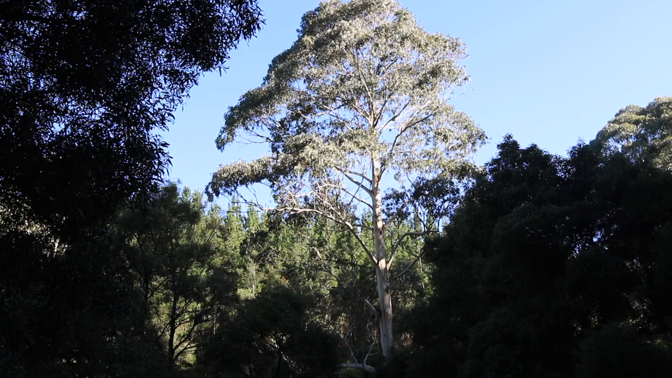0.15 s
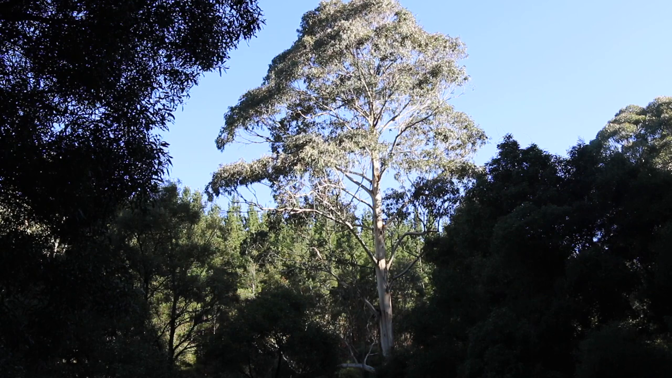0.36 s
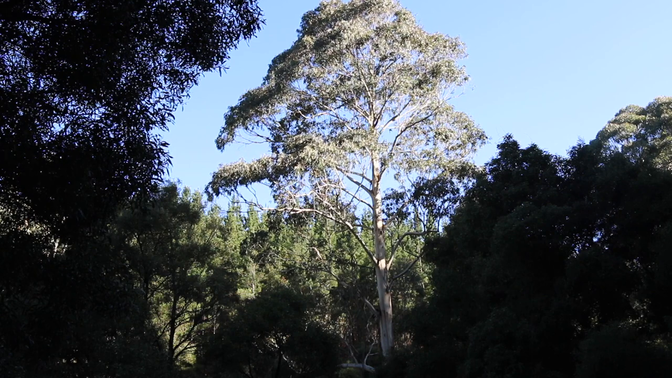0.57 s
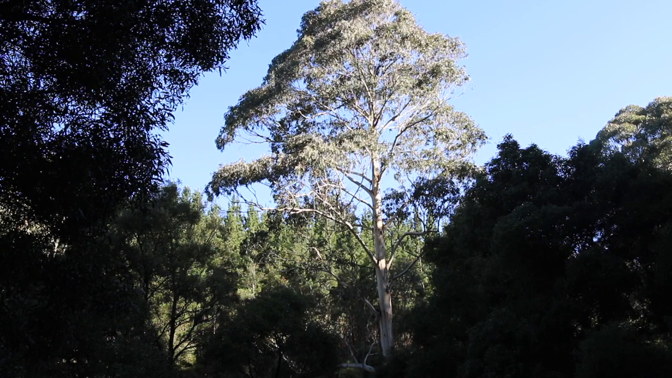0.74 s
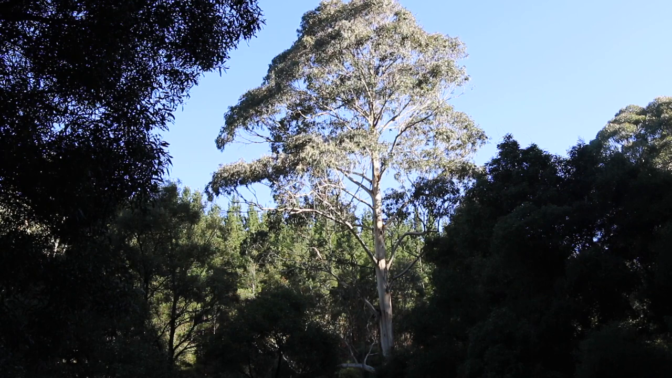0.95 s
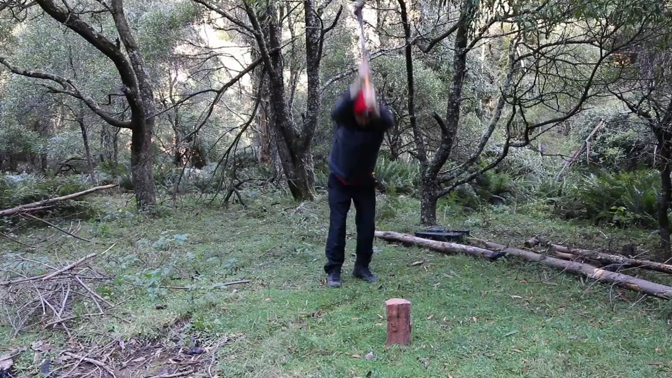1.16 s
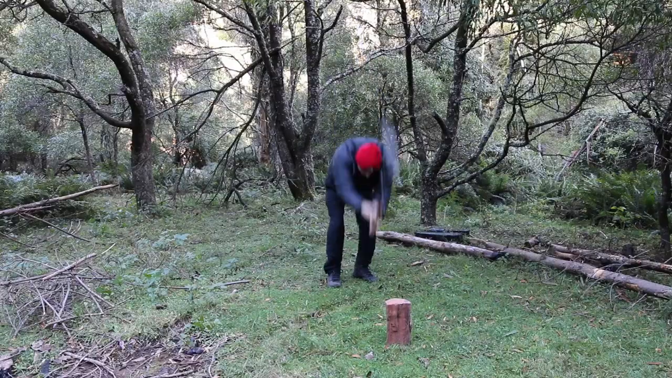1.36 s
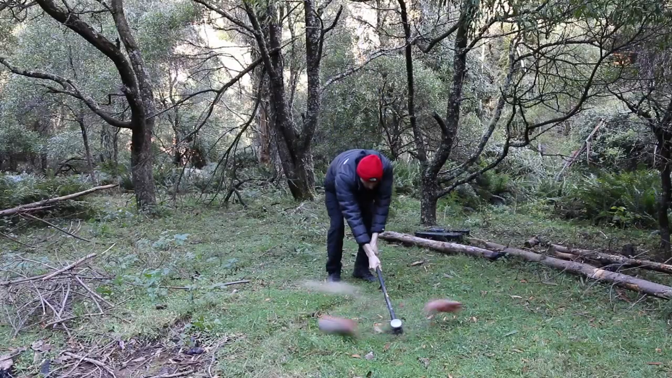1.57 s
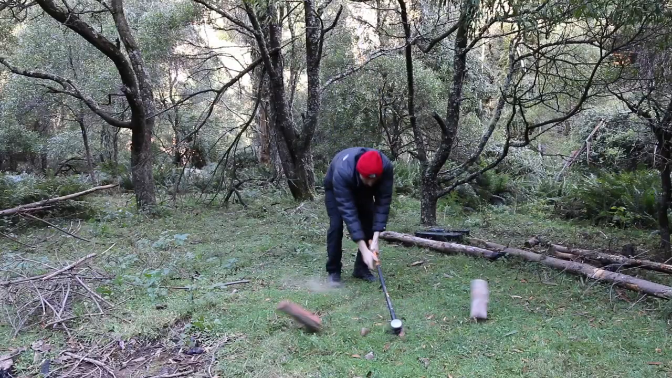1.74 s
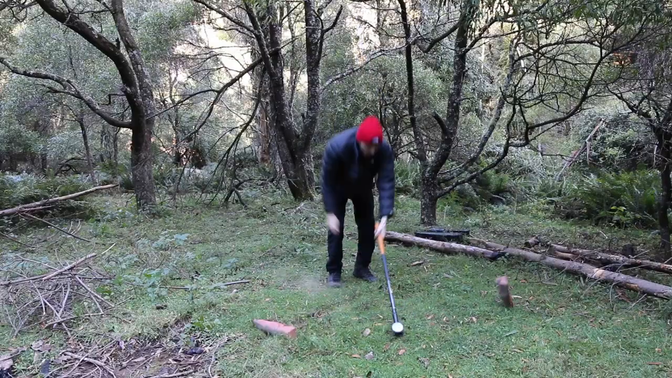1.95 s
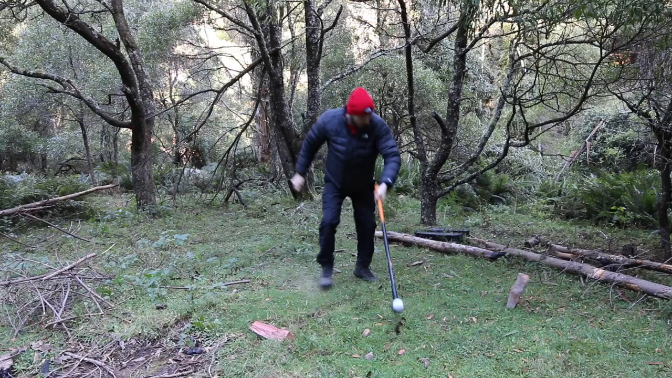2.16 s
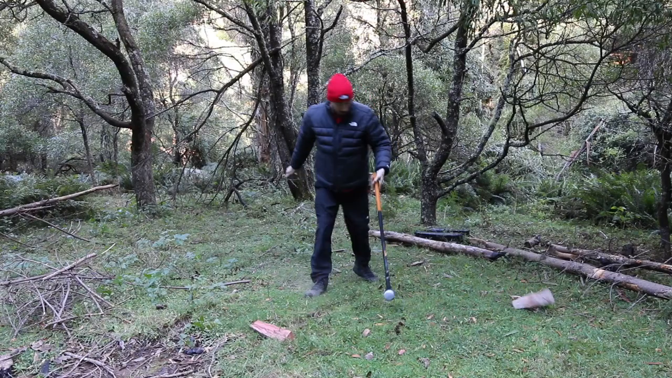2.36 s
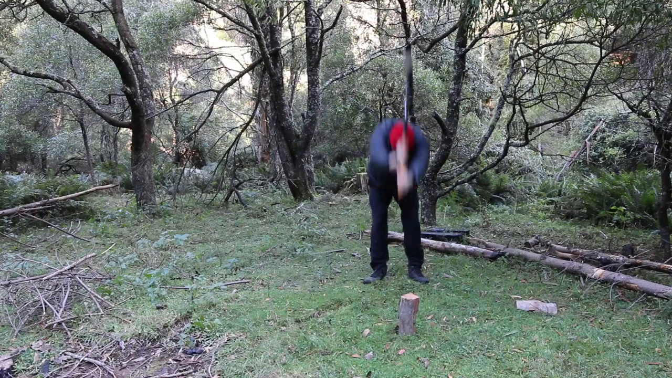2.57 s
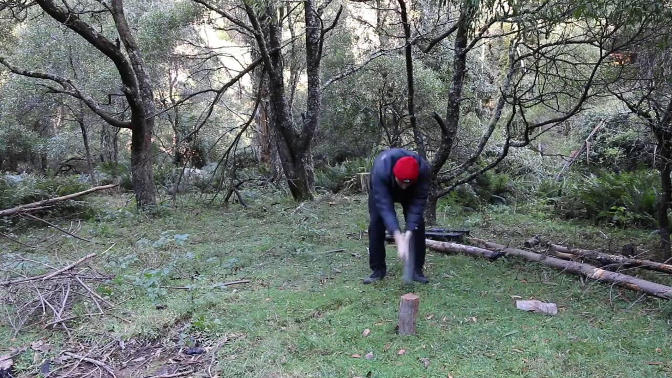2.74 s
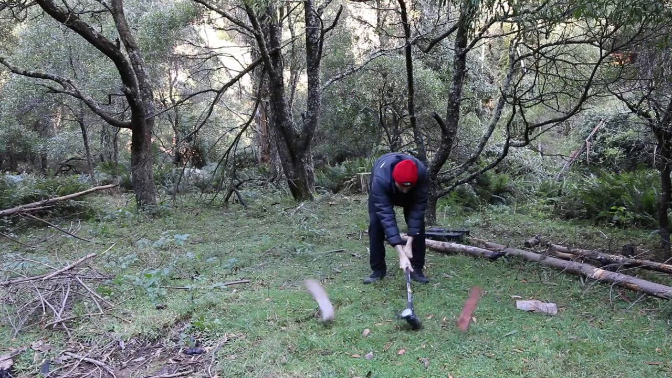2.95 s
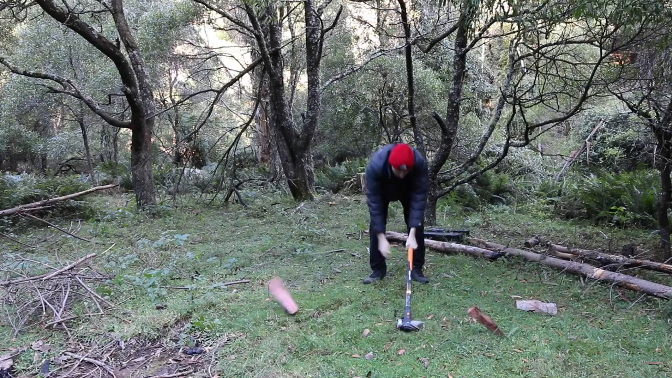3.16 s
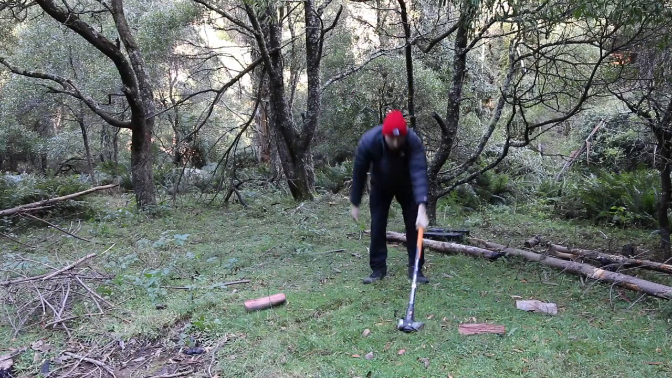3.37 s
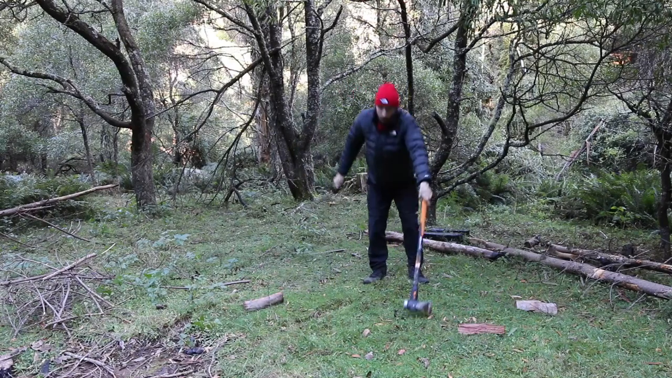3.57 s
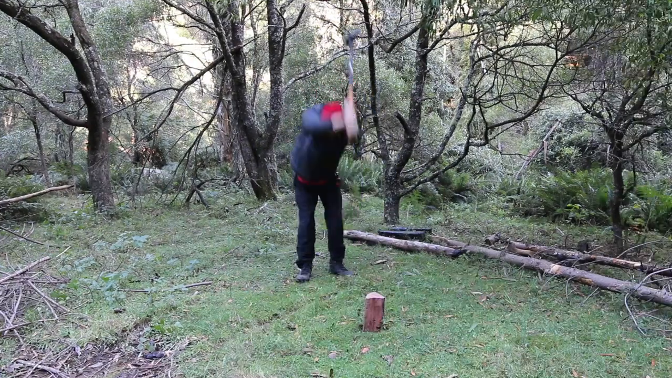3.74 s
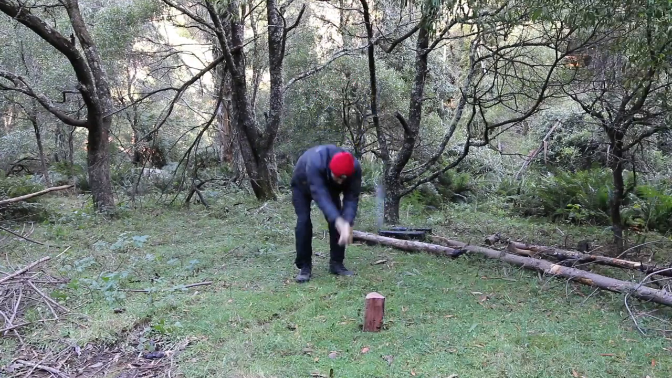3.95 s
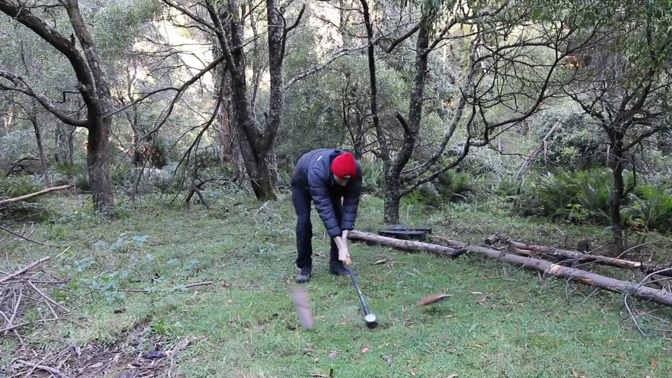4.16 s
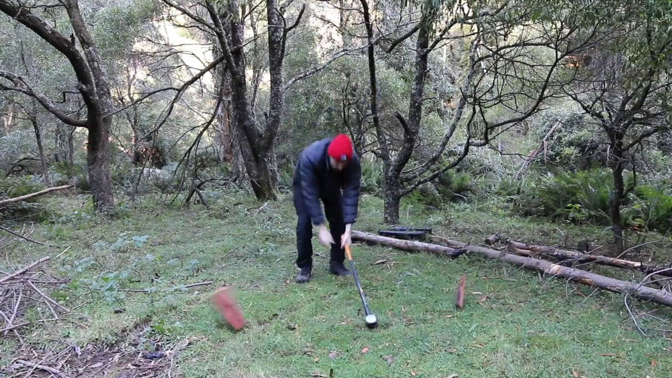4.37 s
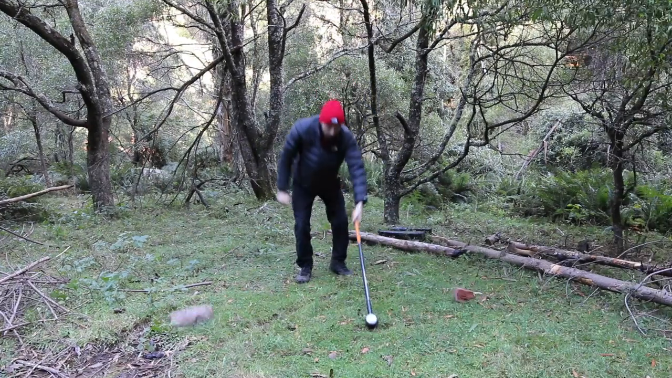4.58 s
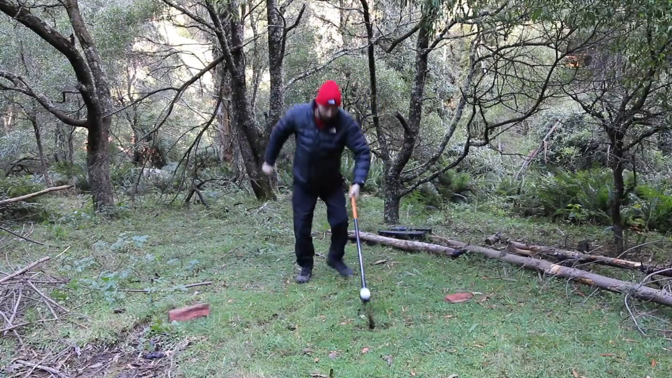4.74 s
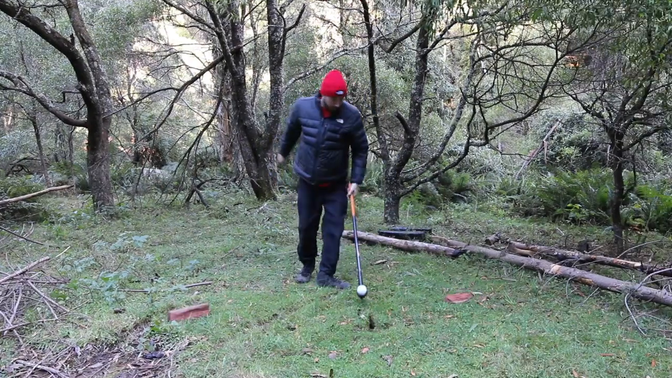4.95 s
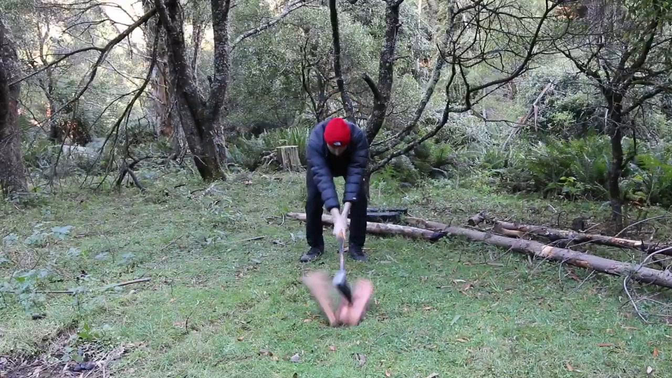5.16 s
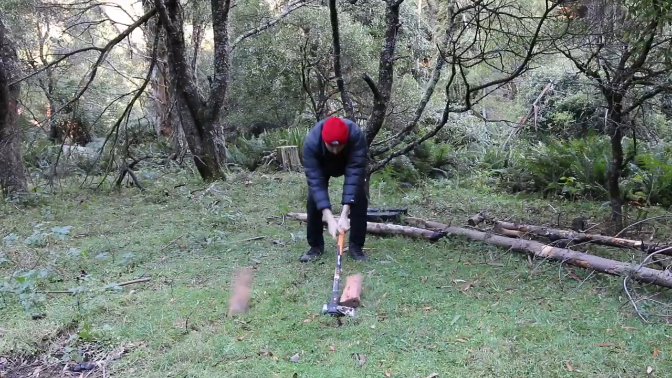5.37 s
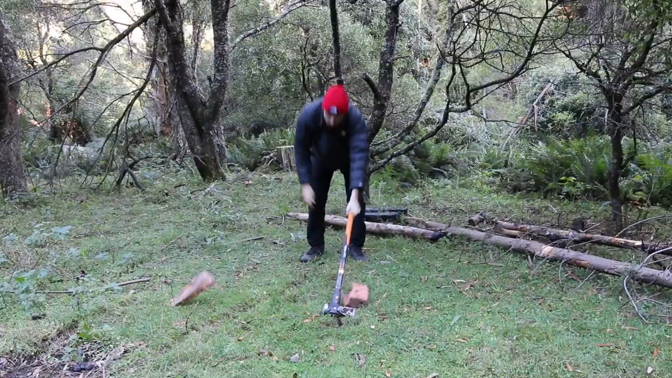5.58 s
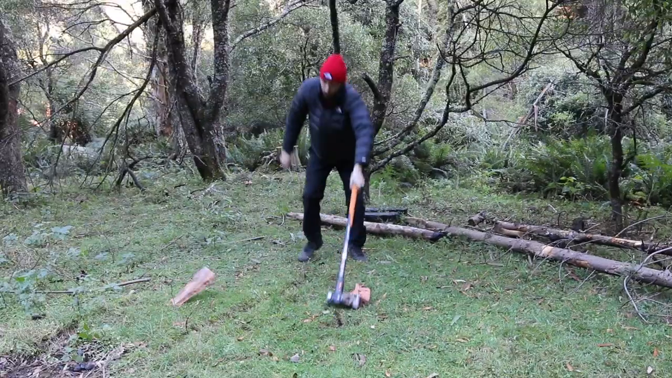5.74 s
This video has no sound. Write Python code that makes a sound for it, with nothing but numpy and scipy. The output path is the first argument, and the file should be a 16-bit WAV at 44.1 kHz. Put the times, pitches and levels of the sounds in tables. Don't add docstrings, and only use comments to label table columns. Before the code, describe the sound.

A very quiet forest opening with a dying breath of wind, a thin insect drone and one hoarse falling bird call. Then an axe splits four logs at roughly even intervals, each a loud, dry, clipped crack with chips, soft turf thuds, grass rustle and a faint diffuse echo among trees. Far birds whistle before the last blow. The stereo microphone stands in the open clearing.

```python
import sys
import numpy as np
from scipy import signal
from scipy.fft import rfft, irfft
from scipy.io import wavfile
from scipy.ndimage import uniform_filter1d

SR = 44100
rng = np.random.default_rng(int(sys.argv[2]) if len(sys.argv) > 2 else 0)


def dump(signal):
    limited = np.clip(np.atleast_2d(signal).T, -1, 1)
    pcm = np.round(limited * 32767).astype(np.int16)
    wavfile.write(sys.argv[1], SR, pcm)


def boost_factor(decibels):
    exponent = np.asarray(decibels, float) / 20
    return 10 ** exponent


N = 256220
TIME = np.arange(N) / SR

# (time [s], peak [dB], mode set [index], bite length [s], echo level [dB])
BLOWS = [
    (1.5169, -0.5, 0, 0.0024, -36),
    (1.5604, -21, 4, 0.00078, -50),
    (2.8299, -6.5, 1, 0.0024, -35),
    (2.868, -3.5, 6, 0.00079, -40.5),
    (4.0709, 0, 2, 0.00087, -41.5),
    (4.1001, -11, 5, 0.0005, -43.5),
    (5.198, 0.5, 3, 0.0022, -37),
    (5.204, -12.5, 1, 0.0011, -50.5),
]
# (frequency [Hz], likeness [clipped to 0 to 1])
FIELD_LIKENESS = [(60, -1.6), (180, 0.88), (550, 0.81), (1650, 0.27), (4970, 0.26), (15000, 0.024)]
# (frequency [Hz], likeness [clipped to 0 to 1])
ECHO_LIKENESS = [(60, 0.86), (180, 0.99), (550, 0.87), (1650, 0.59), (4970, -1), (15000, -1.8)]


def rms_one(x):
    return x / np.sqrt(np.mean(x ** 2) + 1e-20)


def at_hz(points, hz):
    table = np.array(points)
    return np.interp(np.log(hz), np.log(table[:, 0]), table[:, 1])


def ring(force, hz, t60):
    radius = boost_factor(-60 / (t60 * SR))
    angle = 2 * np.pi * hz / SR
    return signal.lfilter([0, np.sin(angle)], [1, -2 * radius * np.cos(angle), radius * radius], force)


def add(out, s, sound):
    i = round(s * SR)
    out[..., i:i + sound.shape[-1]] += sound[..., :N - i]


def panned(x, pan_db):
    return x * boost_factor(np.array([[.5], [-.5]]) * pan_db)


def drift(rate):
    r = np.exp(-2 * np.pi * rate / SR)
    return rms_one(signal.lfilter([1], [1, -2 * r, r * r], rng.standard_normal(N + SR))[SR:])


def stereo_noise(spectrum, size, likeness):
    hz = np.maximum(np.fft.rfftfreq(size, 1 / SR), 1)
    alike = np.clip(at_hz(likeness, hz), 0, 1)
    mid, side = rfft(rng.standard_normal((2, size))) * boost_factor(at_hz(spectrum, hz))
    channels = np.sqrt(1 + alike) * mid + np.sqrt(1 - alike) * side * [[1], [-1]]
    return rms_one(irfft(channels, size))


def axe():
    # (frequency [Hz], level [dB], t60 [s])
    logs = [
        [(250, -39, 0.0295), (763, -6.5, 0.013), (848, -3.5, 0.0022), (1200, -6, 0.0035), (1710, 0, 0.0058),
         (2050, -16, 0.031), (2243, -14, 0.044), (3270, -11, 0.019), (4430, -9, 0.0029), (7150, -10.5, .004),
         (8740, -6, 0.0022)],
        [(201, -22, 0.089), (1083, -7.5, .008), (1571.2, -19.5, 0.0056), (2090, 8, 0.008), (2791.4, 0, .004),
         (3100, -11, 0.0032), (4490, -16, 0.0035), (6580, -8, 0.0034), (9280, -7, 0.0026)],
        [(300, -43, 0.055), (700, -12.5, 0.013), (914, -30.5, 0.028), (1485, 6, 0.0058), (1750, -39, 0.0044),
         (2300, -8.5, 0.0036), (3080, -9.5, 0.027), (4570, -21.5, 0.0076), (6620, -41, 0.0049),
         (9500, -14, .003)],
        [(150.87, -30, 0.011), (620, 1, 0.0054), (1760, -4, 0.0041), (2200, -1, 0.011), (3250, -20.5, 0.011),
         (4020, -5.5, 0.013), (7020, -4.5, 0.0075), (9560, -23.5, 0.0027)],
    ]
    # (frequency [Hz], level [dB], t60 [s])
    splits = [
        [(500, 4, 0.006), (870, -1, 0.0087), (2030, -1, 0.0063), (3417, 3, .004), (4600, -10, .003)],
        [(500, -31, 0.014), (1140, 0, 0.00458), (2200, 6, 0.002), (4230, 0, 0.0022), (6360, 0.5, 0.0042),
         (8850, -27, .003)],
        [(700, -43.5, 0.0062), (1100, -25.5, .005), (1670, 5, 0.0081), (1960, -9, .02), (2640, -1, 0.0054),
         (4750, -10.5, 0.0049), (6250, -11, 0.0043)],
    ]
    tear_s, tear_db = 0.011, -21
    out, t = np.zeros((2, N)), np.arange(SR // 6) / SR
    for s, peak_db, log, bite_s, _ in BLOWS:
        bite = 1 / (1 + (t / bite_s) ** 6)
        tear = boost_factor(tear_db + 2.1 * np.log2(bite_s / 0.0038)) * np.exp(-t / tear_s)
        strain = boost_factor(-8) * bite + tear
        sound = 0
        for hz, level_db, t60 in (logs + splits)[int(round(log))]:
            cracks = rng.random(len(t)) < 5000 / SR
            force = strain * rng.laplace(size=len(t)) * cracks
            force[0] = 1
            sound = sound + boost_factor(level_db) * ring(force, hz, t60)
        spit = rng.standard_normal(len(t) + 1) + .5 * rng.standard_normal((2, len(t) + 1))
        spray = boost_factor(-14) * strain * (1 - np.exp(-t / 0.00072)) * np.diff(spit)
        add(out, s, boost_factor(peak_db) * (sound + spray))
    return out


def splinters():
    chips_per_s, chip_db, fall_t60_s = 180, -41, 0.57
    out, t = np.zeros((2, N)), np.arange(SR // 2) / SR
    for s in [row[0] for row in BLOWS[::2]]:
        tick_db = 2.7 * np.minimum(rng.exponential(1, len(t)), 3) - 60 * t / fall_t60_s
        ticks = boost_factor(tick_db) * (rng.random(len(t)) < chips_per_s / SR)
        pitch_of_tick = rng.integers(0, 10, len(t))
        for k, hz in enumerate(np.geomspace(900, 5000, 10)):
            chips = ring(ticks * (pitch_of_tick == k) + 1e-18, hz, 22 / hz)
            add(out, s + 0.02, panned(boost_factor(chip_db) * chips, rng.normal(0, 4.7)))
    return out


def knocks():
    # (time [s], peak [dB], frequency [Hz], t60 [s], pan [dB])
    collisions = [(2.7137, -30.5, 543, 0.016, -1), (2.903, -20, 1750, 0.01113, 0),
                  (3.199, -28.5, 590, 0.015, 0), (4.525, -24.5, 763, 0.021, -1),
                  (4.590, -37, 740, 0.049, -16), (4.605, -33.5, 746, 0.037, 4),
                  (4.741, -44, 3000, .004, -2), (5.263, -8.5, 700, 0.01, 0.5), (5.3040, -7, 925, 0.0068, 0),
                  (5.371, -14, 3500, 0.013, 2), (5.639, -32.5, 717, 0.079, -3),
                  (5.704, -28, 2200, 0.0054, 3)]
    out, t = np.zeros((2, N)), np.arange(SR // 6) / SR
    for s, peak_db, hz, t60, pan_db in collisions:
        rattle = rng.laplace(size=len(t)) * (rng.random(len(t)) < 1500 / SR)
        force = boost_factor(-18.5) * np.exp(-t / 0.024) * rattle
        force[0] = 1
        sound = ring(force, hz, t60)
        sound = sound + .5 * ring(force, 1.7 * hz, .8 * t60)
        sound = sound + .35 * ring(force, 2.5 * hz, .4 * t60)
        softness = np.clip(.83 - .001 * (peak_db + 30), .3, .95)
        sound = signal.lfilter([(1 - softness) ** 3], np.poly([softness] * 3), sound)
        add(out, s, panned(-boost_factor(peak_db + 0.5) * sound, pan_db))
    return out


def thuds():
    # (time [s], peak [dB], frequency [Hz])
    landings = [(1.563, -14.5, 175), (1.583, -26, 100), (1.652, -21, 102), (1.746, -32, 99.46),
                (1.922, -23, 141), (1.947, -26, 116), (2.239, -39, 111.3), (2.366, -37, 78),
                (2.509, -17.5, 154.4), (2.915, -22, 102), (3.018, -37, 100), (3.209, -41, 110),
                (3.305, -10.5, 127.6), (3.306, -16, 268), (3.36, -32, 130), (3.429, -37, 120),
                (4.113, -24, 115), (4.185, -27.5, 103.4), (4.299, -38, 80), (4.531, -27.5, 173),
                (4.562, -29, 125), (4.719, -30.5, 118), (5.289, -26, 115.9), (5.392, -37, 80),
                (5.602, -22.5, 118)]
    turf_cycles, push_s = 6.8, 0.0002
    out, t = np.zeros(N), np.arange(SR // 4) / SR
    push = t * np.exp(-t / push_s)
    for s, peak_db, hz in landings:
        t60 = turf_cycles / hz
        sound = ring(push, hz, t60) + 0.23 * ring(push, 1.66 * hz, 0.56 * t60)
        add(out, s, boost_factor(peak_db - 7.0) * sound / np.abs(sound).max())
    return out


def grass():
    # (time [s], level [dB], t60 of the fall [s], pan [dB])
    rustles = [(1.3, -59, 0.21, -2), (1.69, -43, 0.043, 4), (1.912, -50.5, 0.22, -4),
               (1.94, -44.5, 0.13, -8), (2.06, -56.5, 0.53, 2), (2.478, -54, 0.17, -9),
               (2.51, -52, 0.061, -4.5), (2.66, -61, .5, 1), (3.177, -51, 0.22, -11.5),
               (3.32, -52, 0.15, 3.5), (3.95, -54, 0.25, 3), (4.30, -49, .12, -5), (4.517, -43, 0.24, 3.5),
               (4.741, -46.5, 0.016, 11), (4.88, -47, 0.48, 1.5), (5.59, -50.5, 0.19, 6),
               (5.705, -45.5, .03, -1)]
    # (frequency [Hz], level per Hz [dB])
    blades = [(880, -39), (1500, -25), (2500, 0), (4080, -5.5), (7000, -2.5), (9850, -3.5), (13500, -10.5),
              (15500, -6.5), (17000, -25)]
    gain = np.zeros((2, N))
    for s, level_db, t60, pan_db in rustles:
        after, rise = np.maximum(TIME - s, 0), 0.064 * t60
        fall = boost_factor(level_db - 60 * np.maximum(after - rise, 0) / t60)
        gain += panned(np.minimum(after / rise, 1) * fall, pan_db)
    grain = boost_factor(2.7 * rms_one(uniform_filter1d(rng.standard_normal(N), size=60)))
    return gain * rms_one(grain * stereo_noise(blades, N, FIELD_LIKENESS))


def forest():
    # (frequency [Hz], level per Hz [dB])
    radiated = [
        [(88, -34), (150, -3.5), (248, -12), (425, -4), (459, -3.5), (515, -3.5), (649, -2.5), (991, -8),
         (1300, -12.5), (2230, -4.5), (2860, -8.5), (15000, -30.5)],
        [(88, -36), (150, -22.5), (221, -14), (273, -12), (364, -22), (589, -9.5), (1130, -6), (1870, 0),
         (2360, -1.5), (2750, -12), (3150, -5), (3820, -16.5), (4810, -15), (15000, -39.5)],
        [(88, -22), (150, -4), (229, -30), (267, -11.5), (459, -6.5), (624, -2.5), (1230, -3.5), (3670, -12),
         (4210, -11.5), (4810, -13.5), (15000, -33.5)],
        [(88, -35), (150, -11), (238, -22), (273, -10), (401, -12.5), (589, -4.5), (833, -9.5), (991, -5.5),
         (1250, -8), (2310, -4.5), (15000, -27.5)],
    ]
    # (frequency [Hz], t60 [s])
    echo_t60 = [(100, 1.3), (500, 1.5), (2000, 1.4), (5000, 0.85), (10000, .5), (16000, 1.5)]
    new_log_s = [
        2.45,
        3.73,
        5.03,
    ]
    near_db, near_t60_s = 5.5, 0.13
    trees_db, build_s, linger_db_per_s = -2.5, .07, 3.5
    t, out = np.arange(SR * 3 // 2) / SR, np.zeros((2, N))
    centres = 40 * 2 ** np.arange(0, 9.1, .5)
    near = boost_factor(near_db - 60 * t / near_t60_s)
    swell = near + boost_factor(trees_db + linger_db_per_s * t) * (1 - np.exp(-t / build_s))
    for s, _, _, _, echo_db in BLOWS:
        colour = radiated[np.searchsorted(new_log_s, s)]
        scattered = rfft(stereo_noise(colour, len(t), ECHO_LIKENESS))
        hz = np.arange(1, scattered.shape[1] + 1) * SR / len(t)
        scattered = scattered * boost_factor(1.2 * drift(66.36)[:len(hz)] / (1 + (hz / 3000) ** 4))
        trunks = boost_factor(1.4 * drift(100)[:len(t)])
        for centre in centres:
            share = np.clip(1 - 2 * np.abs(np.log2(hz / centre)), 0, 1)
            fade = boost_factor(-60 * (t - .22) / at_hz(echo_t60, centre))
            band = irfft(scattered * share, len(t))
            add(out, s, boost_factor(echo_db) * swell * trunks * fade * band)
    return out


def bird():
    start_s, length_s, level_db, fade_db_per_s = .921, .155, -46.5, 75
    low_hz, drop_hz, drop_s, lift_hz_per_s = 1000, 640, .031, 1800
    t = np.maximum(TIME - start_s, 0)
    gate = np.clip(np.minimum(t / 0.01, (length_s - t) / 0.021), 0, 1)
    hz = low_hz + drop_hz * np.exp(-t / drop_s) + lift_hz_per_s * np.minimum(t, length_s)
    phase = 2 * np.pi * np.cumsum(hz + 60 * drift(86)) / SR
    call = gate * boost_factor(level_db - fade_db_per_s * t + 2.1 * drift(76)) * np.sin(phase)
    echoes = [(0, 1.2), (.007, .6), (.016, .45), (.029, .3)]   # (delay [s], gain)
    return sum(gain * np.roll(call, round(delay * SR)) for delay, gain in echoes)


def drones():
    # (start [s], end [s], frequency [Hz], level [dB], wander [Hz])
    tones = [
        (-.1, 1.15, 710.6, -60.5, 2.5),
        (1.15, 5.9, 275, -63, 9),
        (1.17, 1.5, 1325, -59, 45),
        (4.4, 4.65, 2000, -65, 20),
        (4.658, 4.705, 1990, -50.5, 6),
        (4.725, 4.762, 1990, -51.5, 6),
        (4.775, 5.035, 1990, -53.5, 24),
        (4.55, 5.03, 2700, -63, 30),
        (3.74, 3.83, 2480, -55.5, 70),
        (5.6, 5.9, 710, -64, 5),
    ]
    out = np.zeros(N)
    for start, end, hz, level_db, wander_hz in tones:
        gate = np.clip(np.minimum(TIME - start, end - TIME) / .015, 0, 1)
        waver = 12 / wander_hz + drift(wander_hz) + 1j * drift(wander_hz)
        waver = waver / np.sqrt(np.mean(np.abs(waver[gate > 0]) ** 2) / 2)
        out += boost_factor(level_db) * gate * (waver * np.exp(2j * np.pi * hz * TIME)).real
    return out


def ambience():
    # (frequency [Hz], level per Hz [dB])
    hush = [(25, -40.5), (60, -15.5), (153, -16), (277, -11.5), (416, -10), (516, -13), (800, -11),
            (1230, -16), (2610, -21.5), (6000, -26.5), (12000, -31.5), (16000, -36)]
    # (frequency [Hz], level per Hz [dB])
    chatter = [(600, -28.5), (1200, -6), (1900, 6), (2700, 0), (3600, -5.5), (6000, -21.5), (12000, -32)]
    # (start [s], hush level [dB], chatter level [dB], leftover echo above chatter [dB])
    stretches = [
        (0, -54, -82, 0),
        (1.147, -51.5, -64, 14.5),
        (2.45, -52, -62.5, 4),
        (3.73, -50.5, -53.5, 4),
        (5.03, -51.5, -73.5, 5.5),
    ]
    leftover_s = 0.65
    stretch = np.searchsorted(np.array(stretches)[1:, 0], TIME)
    start, hush_db, far_db, leftover_db = np.transpose(stretches)[:, stretch]
    far_db = far_db + leftover_db * np.exp(-(TIME - start) / leftover_s)
    near = boost_factor(hush_db) * stereo_noise(hush, N, FIELD_LIKENESS)
    return near + boost_factor(far_db) * stereo_noise(chatter, N, ECHO_LIKENESS)


def breeze():
    breeze_db, gust_db, gust_t60_s = -72, -57, .5
    spectrum = [(15, -3), (45, -23), (90, -3), (200, -36), (20000, -87.0)]   # (frequency [Hz], level [dB])
    noise = stereo_noise(spectrum, N, [(20, .6), (200, .7)])
    strength = boost_factor(breeze_db) + boost_factor(gust_db - 60 * TIME / gust_t60_s)
    return strength * boost_factor(1.7 * drift(5)) * noise


def scene():
    left_db, left_lag_s = -0.7751, 1.7e-5
    wood = axe() + splinters() + knocks() + thuds()
    wood = signal.sosfilt(signal.butter(3, 75, "high", fs=SR, output="sos"), wood)
    lag = np.exp(-2j * np.pi * np.fft.rfftfreq(N, 1 / SR) * left_lag_s)
    wood[0] = irfft(rfft(wood[0]) * lag, N)
    around = forest() + grass() + bird() + drones() + ambience() + breeze()
    return panned(wood + around, 2 * left_db)


def band_limit(x):
    return signal.sosfilt(signal.butter(12, 16220, fs=SR, output="sos"), x)


def record(dry):
    treble_cut = signal.cheby2(10, 60, 16800, fs=SR, output="sos")
    bass_cut = signal.butter(2, 30, "high", fs=SR, output="sos")
    mix = signal.sosfilt(treble_cut, np.clip(dry, -1, 1))
    mix = signal.sosfilt(bass_cut, mix)
    return band_limit(np.clip(mix, -1, 1))


dry = scene()
out = record(dry)
dump(out)
```